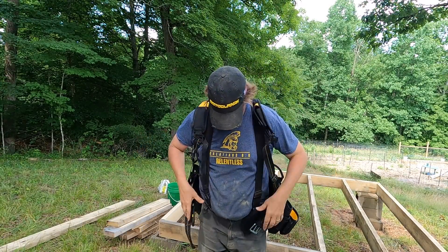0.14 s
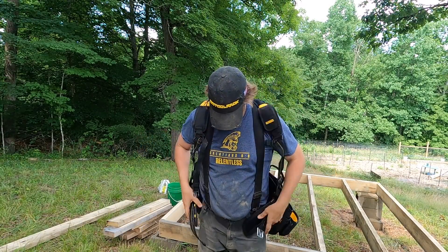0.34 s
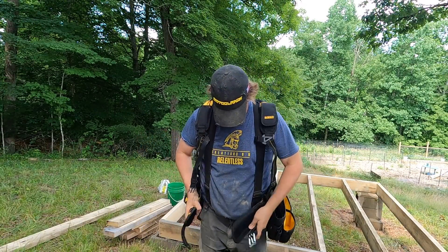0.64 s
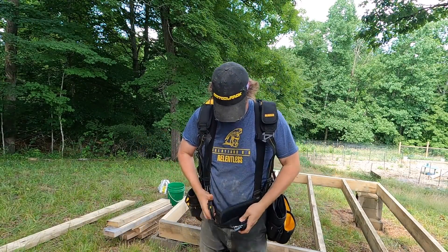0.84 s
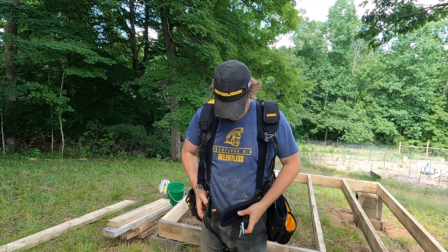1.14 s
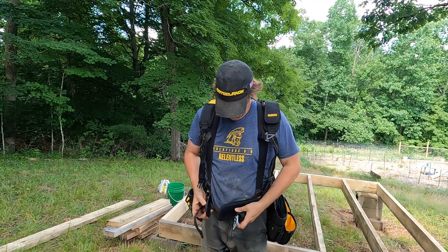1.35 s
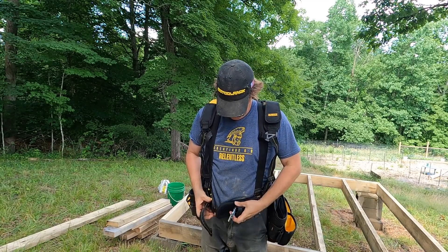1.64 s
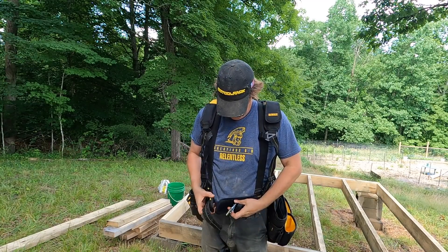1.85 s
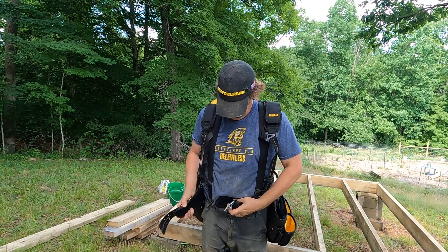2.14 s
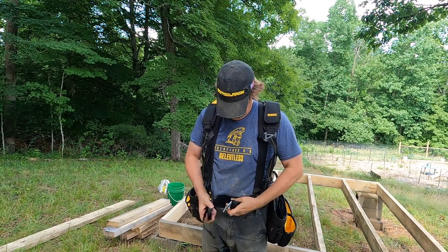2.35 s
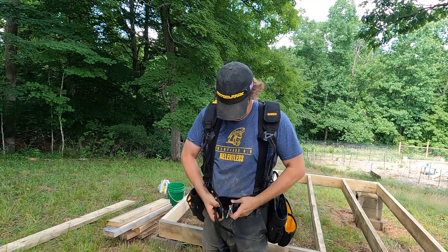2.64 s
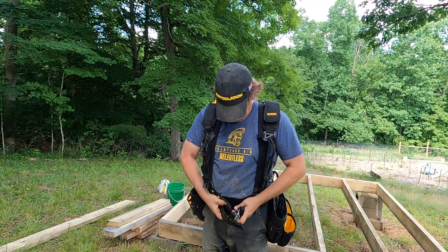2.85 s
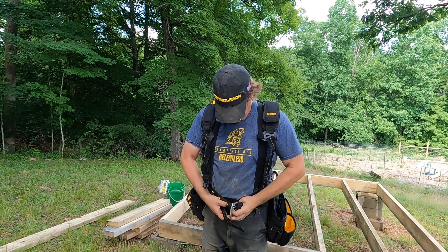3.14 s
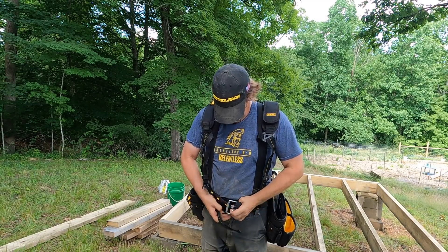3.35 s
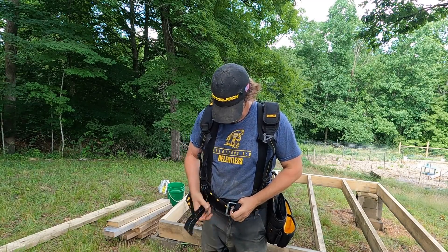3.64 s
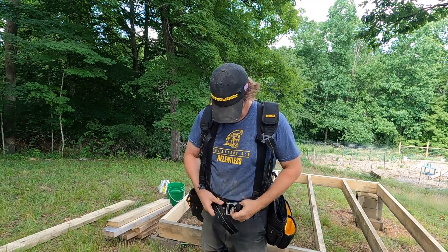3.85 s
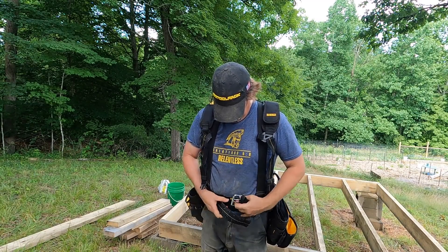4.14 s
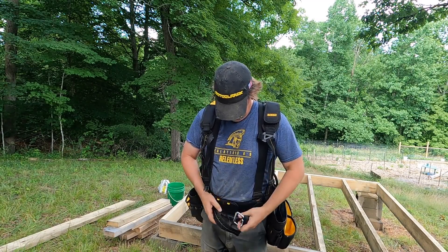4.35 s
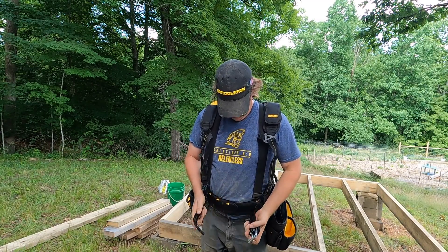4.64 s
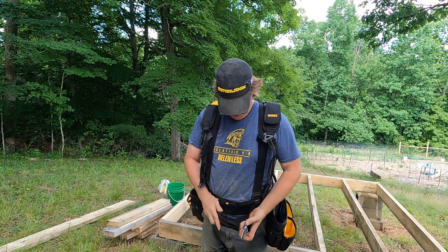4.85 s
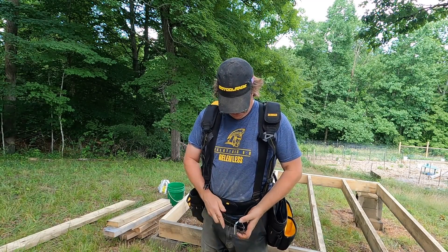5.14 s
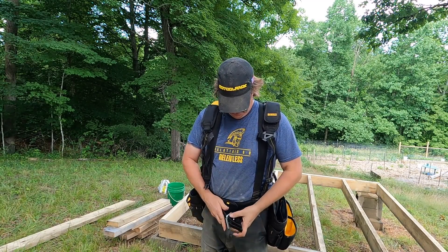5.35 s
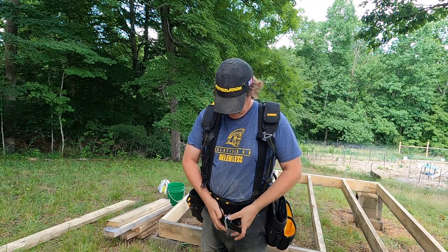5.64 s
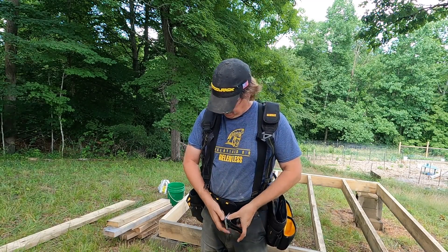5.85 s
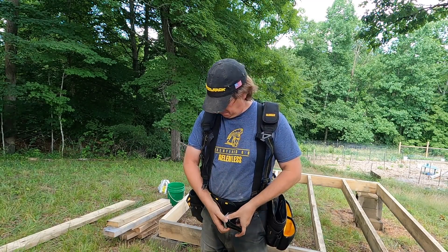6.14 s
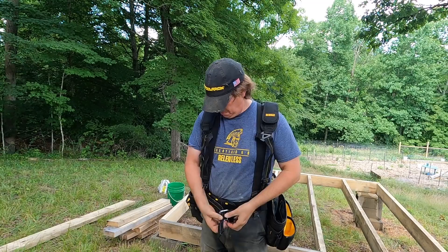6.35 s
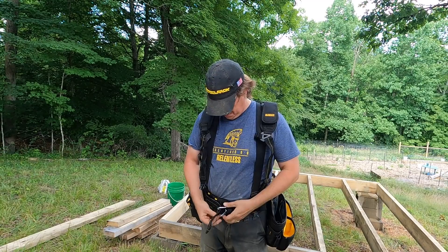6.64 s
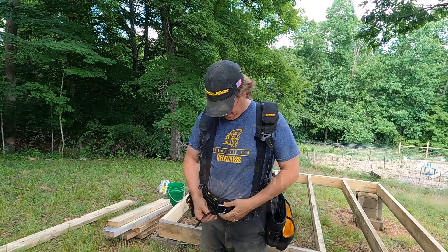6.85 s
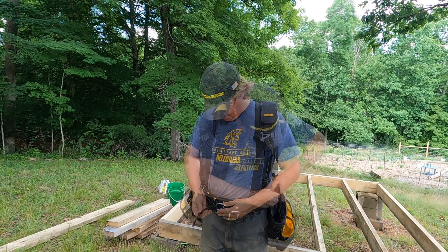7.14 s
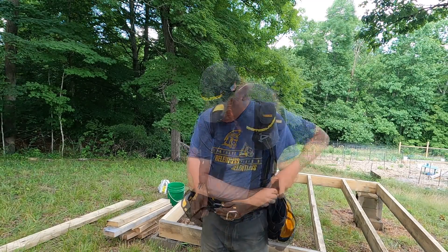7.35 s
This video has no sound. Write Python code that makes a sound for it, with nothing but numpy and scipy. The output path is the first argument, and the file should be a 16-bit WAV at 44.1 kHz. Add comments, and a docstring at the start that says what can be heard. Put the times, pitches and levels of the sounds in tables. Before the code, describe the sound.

Close, bright buckle jangles and dry clicks of tools as a strap is tightened in a quiet yard, with soft hum, leaf hiss and insects behind.

```python
"""A tool belt is pulled round the waist and fastened, outdoors, close in front of the microphone.
Its loose metal buckle jangles as ringing modes, and the halves scrape and snap together as short ones.
Tools tick and knock as struck, damped parts; the webbing rustles as stick-slip fibre noise.
Far off, a motor hums as three sines over the yard's soft noise, with faint insects and falling bird-like chirps.
The yard and insects dip by a few dB near the end and partly recover."""
import sys
import numpy as np
from scipy import signal
from scipy.fft import rfft, irfft, next_fast_len
from scipy.io import wavfile
from scipy.ndimage import uniform_filter1d, map_coordinates

SR = 44100
rng = np.random.default_rng(int(sys.argv[2]) if len(sys.argv) > 2 else 0)


def materialize(psi):
    """Save the field psi as 16-bit PCM at rate SR to the path in sys.argv[1].

    A 1-D psi becomes a single channel; in a 2-D psi each row is a channel.
    """
    bounded = np.clip(np.atleast_2d(psi).T, -1, 1)
    quanta = np.round(bounded * 32767).astype(np.int16)
    wavfile.write(sys.argv[1], SR, quanta)


N = 329868

# Distant yard and insects, relative level. Each row: time in seconds, level in dB.
YARD_LEVEL = [(6.8, 2.5), (7.15, -1), (7.48, 1)]
# The distant motor's steady tones. Each row: frequency in Hz, rms in dB before the yard level.
HUM = [(235.7, -52), (211.7, -65.5), (117.5, -71.5)]
# Spectrum of the motor's low rumble. Each row: frequency in Hz, density in dB per Hz.
YARD_LOW = [(15, -68), (25, -41.5), (130, -20), (156, -6.5), (204, -9), (259, -11.5), (366, -13),
            (445, -17.5), (565, -16.5), (900, -21), (1170, -66), (1980, -120)]
# Spectrum of the trees' hiss. Each row: frequency in Hz, density in dB per Hz.
YARD_HIGH = [(530, -46), (900, -37), (932, -11), (1020, 3), (1760, 2), (2200, 0), (3530, -3), (4510, -2.5),
             (5450, -7.5), (6580, -13), (9260, -35.5), (11400, -28), (15000, -56)]
# A thin band of distant insects. Each row: frequency in Hz, density in dB per Hz.
INSECTS = [(4800, -38), (5600, 18), (6400, -40)]
RUMBLE_SWELL_DB = .8  # depth of the rumble's slow swells

# Light, continual rubbing of the webbing. Each row: time in seconds, relative level in dB.
RUB = [(0, -47), (.42, -46.5), (.72, -41), (1.05, -45), (1.6, -50.5), (2.0, -52), (2.35, -44.5),
       (2.72, -50), (3.35, -43), (3.7, -51.5), (4.5, -46.5), (5.0, -53), (6.2, -57), (6.68, -45.5),
       (7.1, -54.5)]
# Firm strokes of strap, pouch and sleeve.
# Each row: middle in seconds, relative level in dB, half-length in seconds, centre in Hz.
STROKES = [(0.243, -41, 0.014, 2400), (0.543, -37.5, 0.056, 2200), (0.637, -41, 0.077, 1600),
           (1.01, -47.5, 0.044, 2100), (1.763, -39.5, 0.05, 550), (1.782, -41, 0.091, 2000),
           (2.106, -43.5, 0.042, 1990), (2.218, -37, 0.041, 2900), (2.518, -42.5, 0.046, 2800),
           (2.94, -43, 0.077, 1000), (3.411, -35, 0.03, 895), (3.939, -41.5, .03, 1900),
           (3.989, -42.5, 0.04, 1700), (4.426, -42.5, .07, 2200), (5.246, -46, 0.011, 1100),
           (5.412, -41, 0.02, 1100), (6.377, -45.5, 0.092, 2000), (6.957, -44, 0.018, 3000),
           (6.743, -48, 0.074, 2200)]
# Spectrum of the webbing. Each row: frequency in Hz, density in dB per Hz.
WEBBING = [(100, -26), (400, -4.5), (900, -7.5), (1600, -1.5), (2500, 1.5), (4000, -1.5), (6000, -11.5),
           (7300, -16), (8700, -32.5), (10800, -21.5), (12200, -35.5), (13500, -38), (15500, -51)]
FOLDS_DB = 2.8  # how far the colour drifts from fold to fold
CATCH_SPREAD_DB = 4  # unevenness of random impulses

# Blows on the loose buckle.
# Each row: start in seconds, relative ring level in dB, pitch in Hz, relative clash level in dB.
CLINKS = [(0.0091, -14.5, 4270, -37), (0.029, -19, 4250, -44), (0.1235, -24, 4200, -48),
          (0.1292, -16, 4140, -47), (0.139, -19.5, 4170, -55), (0.1825, -24.5, 4000, -33),
          (0.2115, -35, 4240, -50), (0.4366, -28.5, 4320, -43), (0.5632, -15.5, 4170, -33),
          (0.6225, -28, 4300, -34), (0.6265, -10, 4170, -25.5), (0.635, -20, 4140, -41),
          (0.6502, -26, 4000, -37), (0.6565, -24, 5000, -42), (0.6776, -17.5, 4200, -33),
          (0.683, -19, 4280, -35), (0.7071, -24, 4230, -40), (0.7255, -10.5, 4180, -18.5),
          (0.7352, -21, 4200, -28.5), (0.7694, -25, 4120, -42), (0.7964, -28, 4150, -46),
          (0.8035, -28, 3930, -32.5), (0.8809, -6.5, 4240, -39), (0.885, -10, 4170, -32),
          (0.889, -16, 4350, -35), (0.9012, -19.5, 4210, -31.5), (1.0598, -24.5, 4180, -34),
          (1.094, -29, 4120, -26), (1.2875, -17, 4175, -39.5), (1.503, -30.5, 4170, -63),
          (1.8234, -36, 4100, -38), (2.157, -32, 4190, -46), (2.9802, -15.5, 4040, -25.5),
          (3.0455, -15, 4100, -26.5), (3.0524, -13.5, 4030, -27), (3.0771, -19.5, 4020, -29.5),
          (3.082, -21, 4220, -36), (3.1188, -30, 4170, -45), (3.1387, -27, 4150, -35),
          (3.1577, -29, 4170, -36.5), (3.171, -33, 4140, -35), (3.2065, -35, 4950, -34),
          (3.225, -27, 4180, -31), (3.2315, -23, 4180, -37), (3.254, -36, 4220, -56),
          (3.2839, -18, 4200, -40), (3.2945, -21, 4160, -44), (3.3115, -30, 4070, -53),
          (3.3278, -22, 4250, -31), (3.34, -40, 4130, -37), (3.3995, -33, 4030, -26),
          (3.4057, -23, 4140, -44), (3.413, -33, 3860, -45), (3.4949, -29.5, 4150, -43),
          (4.0611, -14.5, 4140, -28), (4.0753, -19.5, 4200, -31), (4.1166, -28, 4120, -33.5),
          (4.4373, -21, 4160, -29), (4.4587, -17, 4070, -39), (4.469, -2.5, 4144, -34.5),
          (4.4756, -6.5, 4140, -28), (4.4855, -19, 4070, -26), (4.4882, -18, 4080, -30),
          (4.496, -13.5, 4130, -30), (4.5025, -21, 4190, -31), (4.586, -26, 4170, -39.5),
          (4.6005, -29, 3960, -36.5), (4.6157, -30, 4140, -30.5), (5.3374, -28, 4240, -40),
          (5.3868, -25, 4100, -36.5), (5.395, -23, 4140, -42), (6.685, -28, 4160, -51),
          (6.6961, -21, 4120, -39), (6.712, -29, 4130, -44), (6.722, -29, 4050, -29.5),
          (6.731, -20, 4120, -34), (6.7495, -27, 4220, -36), (6.7968, -36, 4200, -44)]
# The loose buckle shakes and chatters.
# Each row: start in seconds, length in seconds, relative ring level in dB, relative clash level in dB.
JANGLES = [(0.002, 0.028, -25.5, -44), (0.104, 0.044, -25.5, -39.5), (0.612, 0.064, -30, -39),
           (0.686, .06, -34, -37), (0.755, .065, -35, -43), (1.099, 0.025, -27.5, -36),
           (2.198, 0.025, -35, -44), (3.286, 0.027, -48, -67), (4.574, 0.032, -36, -52),
           (5.342, 0.062, -34, -49), (6.7, 0.057, -34, -46)]
# Further modes of the loose buckle.
# Each row: nominal frequency in Hz, relative level in dB, t60 in seconds when wholly free.
LOOSE_MODES = [(2900, -18, .05), (3855, -12, .045), (4148, -14, .16), (4300, -14, .05), (4515, -16, .08),
               (4973, -8, .1), (5990, -26, .06), (7615, -30, .09), (8892, -39, .24), (9590, -36, .13),
               (11003, -31, .07), (11395, -34, .16), (12600, -44, .15), (14110, -50, .12)]
# How freely the loose buckle rings as the grip changes. Each row: time in seconds, share of its free t60.
FREEDOM = [(0, 0.45), (1.3, 0.66), (3.05, 0.33), (3.33, 0.87), (4.07, 0.5), (4.5, 0.72), (5.4, 0.38)]
# Relative level of the buckle's treble modes. Each row: time in seconds, level in dB.
SPARKLE = [(0, -11), (.7, 0), (1.1, -3), (1.3, 6), (3.05, -9), (3.33, 9), (4.07, 5), (4.5, 7), (5.4, 1),
           (5.49, -8), (6.41, 2.5), (6.46, 11), (6.57, -3)]
# Spectrum of clashing metal. Each row: frequency in Hz, density in dB per Hz.
CLASH = [(300, -22), (1000, -11.5), (1800, 0.5), (3000, -1), (4200, -1.5), (5500, -1.5), (7000, -3.5),
         (8400, -21), (10000, -9.5), (11400, -17), (12100, -28), (13500, -22), (15500, -54)]
SPARKLE_ABOVE_HZ = 8000
SCATTER_DB = 5  # spread of mode levels from contact to contact
# Chatter: main mode (Hz), its spread (Hz), spread of force (dB)
CHATTER_HZ, CHATTER_SPREAD_HZ, CHATTER_SPREAD_DB = 4167, 70, 0.5
PRESS_DETUNE = .045  # share by which a fully pressed buckle's modes shift from touch to touch
# Touching metal buzzes: phase swing when fully pressed (radians), random knots per second
BUZZ_RAD, BUZZ_RATE = .7, 700
# Rings, rivets and springs that each contact shakes: range (Hz), nominal level (dB), middle t60 (s)
FITTINGS_LOW_HZ, FITTINGS_HIGH_HZ = 2600, 14000
FITTINGS_DB, FITTINGS_T60 = -8, .035

# Dry clicks of clips and tools in the pouches.
# Each row: start in seconds, relative peak in dB, centre in Hz, t60 in seconds.
CLICKS = [(0.238, -33, 2620, 0.011), (0.27, -26, 3000, 0.0093), (0.327, -24, 2740, 0.02),
          (0.6435, -24, 2350, 0.0095), (0.7265, -19.5, 2810, 0.037), (0.862, -25, 3400, 0.0071),
          (2.181, -25, 3660, 0.0087), (2.2355, -23, 2330, 0.011), (2.2715, -22, 2650, 0.012),
          (2.354, -21.5, 1800, 0.012), (2.3728, -23.5, 1770, 0.013), (2.4556, -22.5, 2600, 0.0035),
          (2.484, -24.5, 1980, 0.0044), (2.5278, -24, 3130, 0.0044), (2.814, -26, 2800, 0.011),
          (2.833, -24.5, 2290, 0.018), (2.8863, -24, 2080, 0.013), (2.9222, -26, 2670, 0.014),
          (2.9943, -18, 2670, 0.0055), (3.0183, -24.5, 2700, 0.013), (3.054, -19, 3440, 0.028),
          (3.2068, -19, 2620, 0.035), (3.3285, -26.5, 2300, 0.033), (3.4, -23, 2670, 0.029),
          (3.423, -24, 2850, .014), (4.314, -30, 4460, .005), (5.0476, -26.5, 2540, 0.013),
          (5.906, -30.5, 3680, .01), (6.7225, -26.5, 2000, .01), (6.7387, -11, 3540, 0.01),
          (6.7795, -23, 3170, 0.0039), (6.9455, -28, 3370, 0.014), (6.9492, -21, 2680, 0.033),
          (7.389, -30, 1820, 0.02), (7.3973, -15, 3470, 0.0086)]
# Overall colour of the clicks. Each row: frequency in Hz, gain in dB.
CLICK_COLOUR = [(100, -16), (450, 3), (1300, 1), (3500, 0), (5000, 1), (7000, -8), (8600, -24),
                (10600, -16), (12200, -27), (13500, -27), (15500, -52)]
# Ringing modes of a click. Each row: multiple of the centre, relative level in dB.
CLICK_MODES = [(1.001, 7), (1.33, -3.5)]
CLICK_TONE, RINGING_T60 = .9, .04  # share of ringing in a free part, and the t60 (s) that counts as free
CLACK_OCTAVES = 1.6  # breadth of a click's hump
LOW_EDGE = .48  # small parts radiate little below this share of their centre frequency
TICK_HZ, TICK_T60 = 2700, 0.003  # small ticks: middle of their centres, decay (s)
TICK_OVER_RUB_DB, TICK_SPREAD_DB, TICK_SPREAD_OCTAVES = 11, 3.5, .35

# Faint falling chirps, probably a bird in the trees.
# Each row: start in seconds, level in dB, nominal start frequency in Hz.
CHIRPS = [(2.63, -48, 4600), (2.772, -51, 4850), (3.335, -40, 4950), (3.462, -41, 4850), (3.585, -45, 4550)]

# Dull knocks of latch and pouch, one short push each.
# Each row: start in seconds, peak in dB before scatter, centre in Hz.
KNOCKS = [(3.5576, -21, 1700), (3.5666, -14, 1560), (3.5692, -10.5, 1470), (4.5592, -18.5, 2150),
          (5.0433, -16.5, 1200), (5.2423, -26, 1000), (6.7387, -13.5, 1990), (7.056, -25, 1900),
          (7.3979, -20, 2100)]
# Overall colour of the knocks. Each row: frequency in Hz, gain in dB.
KNOCK_COLOUR = [(150, -19), (500, 3), (3500, -3.5), (7000, -4), (9000, -18), (15000, -38)]

# The buckle halves snap together, held in the fingers.
# Each row: start in seconds, relative ring level in dB, pitch in Hz, relative clash level in dB.
SNAPS = [(4.7335, -28, 4060, -28), (4.7362, -19.5, 4170, -22), (4.815, -39, 4230, -37),
         (5.0502, -42, 5400, -34), (5.259, -39, 4100, -39), (5.4805, -16, 4240, -29),
         (5.4865, -4, 4270, -26.5), (5.4895, -17, 4180, -20), (6.4055, -1.5, 4250, -30),
         (6.4114, -9, 4300, -34), (6.414, -8, 4340, -29), (6.4172, -10, 4260, -38), (6.4218, -4, 4200, -29),
         (6.4263, -3.5, 4330, -23), (6.448, -17, 4200, -31.5), (6.4668, -19, 4400, -41),
         (6.4715, -16.5, 4240, -43), (6.505, -36, 4200, -56), (6.5684, -9, 4970, -28),
         (6.5703, -11.5, 5100, -30), (6.5718, -16.5, 3950, -43), (6.5922, -26, 3750, -40),
         (6.599, -30, 3950, -38), (6.6035, -29, 3850, -33)]
# The held halves skid over each other.
# Each row: start in seconds, length in seconds, relative ring level in dB, relative clash level in dB.
SCRAPES = [(4.739, 0.017, -22, -32), (6.432, 0.023, -28, -41)]
# Further modes of the held buckle. Each row: nominal frequency in Hz, relative level in dB, t60 in seconds.
HELD_MODES = [(2930, -19, .03), (3870, -11, .04), (4510, -12, .04), (4990, -12, .035), (6000, -20, .035),
              (6400, -19, .035), (6980, -19, .03), (7600, -23, .02), (9820, -24, .035), (10450, -27, .02),
              (11350, -31, .02)]

# Spread to the sides. Each row: frequency in Hz, side level against the middle in dB.
SIDE_LEVEL = [(200, -51), (2500, -52.5), (7000, -34.5), (10000, -30), (12000, -5)]
TOP_HZ = 15500  # upper band limit of the microphone channel


def amp(db):
    """Amplitude factor of a level in dB."""
    return 10 ** (np.asarray(db) / 20)


def unit(x):
    """x scaled to rms 1."""
    return x / np.sqrt(np.mean(x ** 2) + 1e-20)


def along(points, hz):
    """Values of (Hz, value) points, read on a log frequency axis."""
    f, v = np.transpose(points)
    return np.interp(np.log(hz + 1), np.log(f + 1), v)


def curve(rows):
    """(s, value) rows as one value per sample."""
    return np.interp(np.arange(N) / SR, *np.transpose(rows))


def wobble(rate):
    """A smooth random curve, rate knots a second."""
    knots = rng.standard_normal(int(N * rate / SR) + 4)
    return map_coordinates(knots, [np.arange(N) * rate / SR])


def filtered(x, response):
    """x times a response of frequency."""
    m = next_fast_len(N + SR // 2)
    return irfft(rfft(x, m) * response(np.fft.rfftfreq(m, 1 / SR)), m)[..., :N]


def coloured(x, spectrum):
    """x with the given spectrum, at rms 1."""
    return unit(filtered(x, lambda hz: amp(along(spectrum, hz))))


def impulse(gain, size=512):
    """Causal response of energy 1 with the given gain over frequency, by folding its cepstrum."""
    cep = irfft(np.log(gain(np.fft.rfftfreq(size, 1 / SR)) + 1e-6))
    cep[1:size // 2] *= 2
    cep[size // 2 + 1:] = 0
    h = irfft(np.exp(rfft(cep)))
    return h / np.linalg.norm(h)


def body(spectrum, centre, octaves):
    """Response of a small part: a broad hump with a steep low edge."""
    hump = lambda hz: np.hypot(1, 2 * np.log2((hz + 1) / centre) / octaves)
    edge = lambda hz: np.hypot(1, (LOW_EDGE * centre / (hz + 1)) ** 3)
    return impulse(lambda hz: amp(along(spectrum, hz)) / hump(hz) / edge(hz))


def decay(t, t60):
    """Amplitude that falls 60 dB in t60."""
    return np.exp(-np.log(1000) * t / max(t60, 1e-3))


def add(track, s, sound):
    """Mix a sound into the track at time s."""
    i = max(round(s * SR), 0)
    track[i:i + len(sound)] += sound[:max(N - i, 0)]


def grains(rate, size):
    """Sparse random impulses of uneven size, rate a second, rms about 1."""
    spread = np.minimum(rng.exponential(size=size), 2) - 1
    sizes = rng.standard_normal(size) * amp(CATCH_SPREAD_DB * spread)
    return (rng.random(size) < rate / SR) * sizes * np.sqrt(SR / rate)


def yard(low_db=-53.5, high_db=-54.5):
    """Far off: a steady motor hum, its low rumble and the hiss of the trees."""
    t = np.arange(N) / SR
    drift = 0.0001 * wobble(1.8)  # the shaft speed wanders slightly
    hum = sum(amp(db) * np.sqrt(2) * np.sin(2 * np.pi * hz * (t + drift)) for hz, db in HUM)
    hum = hum * amp(0.1 * wobble(2.05))
    rumble_level = amp(low_db + RUMBLE_SWELL_DB * wobble(2.81))
    rumble = rumble_level * coloured(rng.standard_normal(N), YARD_LOW)
    tree_level = amp(high_db + 0.13 * wobble(2.5))
    trees = tree_level * coloured(rng.standard_normal(N), YARD_HIGH)
    return (hum + rumble + trees) * amp(curve(YARD_LEVEL))


def insects(level_db=-63.5):
    """Far insects sing together as one narrow hiss that follows the yard level."""
    return amp(level_db + curve(YARD_LEVEL)) * coloured(rng.standard_normal(N), INSECTS)


def fibres(catches, catch_share, flutter_db=3.2, slips=130):
    """Friction force: a hiss of fibres that sticks and slips, with small catches."""
    hiss = rng.standard_normal(N) + catch_share * grains(catches, size=N)
    return hiss * unit(amp(flutter_db * wobble(slips)))


def patchy(x, depth_db, width_hz=600, length_s=.04):
    """The colour drifts as different folds touch: smooth random patches of gain."""
    z = signal.stft(x, nperseg=256)[2]
    field = rng.standard_normal(z.shape)
    for _ in range(2):
        field = uniform_filter1d(field, round(width_hz * 256 / SR), axis=0)
        field = uniform_filter1d(field, round(length_s * SR / 128), axis=1)
    gain = unit(amp(depth_db * unit(field)))
    return signal.istft(z * gain, nperseg=256)[1][:N]


def webbing(rub_db=-1, stroke_db=-1, octaves=2.1):
    """Nylon slides over cloth all the time; each firm stroke swells and has its own colour."""
    out = amp(rub_db + curve(RUB)) * coloured(fibres(catches=320, catch_share=0.61), WEBBING)
    force = fibres(catches=640, catch_share=1.04)
    for s, db, half_length, centre in STROKES:
        swell = np.hanning(round(2 * half_length * SR))
        cloth = body(WEBBING, centre, octaves)
        push = force[round(s * SR):][:len(swell)]
        stroke = unit(signal.fftconvolve(push, cloth)[:len(swell)])
        add(out, s - half_length, amp(db + stroke_db) * swell * stroke)
    return patchy(out, FOLDS_DB)


def fittings(t, count=14):
    """Every contact shakes a different handful of small metal parts, each with its own brief ring."""
    place, force, life, phase = rng.random((4, count, 1))
    hz = FITTINGS_LOW_HZ * (FITTINGS_HIGH_HZ / FITTINGS_LOW_HZ) ** place
    size = amp(FITTINGS_DB + along(CLASH, hz)) * 2 * force ** 2
    rings = np.sin(2 * np.pi * (hz * t + phase)) * decay(t / (.5 + life), FITTINGS_T60)
    return np.sum(size * rings, axis=0)


def buckle(contacts, modes, freedom, sparkle_db, ring_db, ring_t60, halving_db, modes_db,
           clash_db, clash_t60, attack, rattle_db, rattle_t60):
    """Each contact restarts the main bending mode, rings the others, clashes and sets off a fine rattle."""
    metal, clashes, rattles = np.zeros((3, N))
    t = np.arange(SR // 4) / SR
    short = SR // 20
    gaps = np.diff([row[0] for row in contacts], append=N / SR)
    onset = 1 - np.exp(-t / attack)
    for (s, db, pitch, hard_db), gap in zip(contacts, gaps):
        now = max(round(s * SR), 0)
        free = max(freedom[now], .1)
        # a harder blow presses the parts together and rings shorter
        t60 = ring_t60 * free * 2 ** (-db / halving_db)
        choke = decay(np.maximum(t - gap, 0), 0.0049)  # the next contact stops the old swing
        buzz = BUZZ_RAD * (1 - free) * map_coordinates(rng.standard_normal(BUZZ_RATE), [t * BUZZ_RATE])
        ring = amp(db + ring_db) * np.sin(2 * np.pi * pitch * t + buzz) * decay(t, t60) * choke
        strength_db = (db + hard_db) / 2  # hard contacts feed the other modes more
        for hz, level, free_t60 in modes:
            life = free_t60 * free
            treble_db = sparkle_db[now] * (hz > SPARKLE_ABOVE_HZ)
            size = free * amp(strength_db + modes_db + level + treble_db + SCATTER_DB * rng.normal())
            # touch shifts the damped modes most
            detune_hz = 1.3 / life + PRESS_DETUNE * hz * (1 - free) ** 2
            detuned = hz + detune_hz * rng.normal()
            phase = rng.uniform(0, 2 * np.pi)
            ring += size * np.sin(2 * np.pi * detuned * t + phase) * decay(t, life)
        add(metal, s, ring * onset)
        add(metal, s, amp(hard_db) * fittings(t[:short]) * onset[:short])
        clash = grains(6000, size=len(t)) * decay(t, clash_t60) * onset ** 2
        add(clashes, s, amp(hard_db + clash_db) * clash)
        rattle = grains(500, size=len(t)) * decay(t, rattle_t60)
        add(rattles, s, amp(strength_db + rattle_db) * rattle)
    splash = lambda hz: amp(along(CLASH, hz))
    # tiny bounces favour the main mode
    tinkle = lambda hz: splash(hz) * (1 + 5.0 / np.hypot(1, (hz - 4250) / 220))
    clash_sound = signal.fftconvolve(clashes, impulse(splash))[:N]
    rattle_sound = signal.fftconvolve(rattles, impulse(tinkle))[:N]
    return metal + clash_sound + rattle_sound


def chatter(bursts, count=10):
    """Each burst is a handful of unevenly spaced contacts: rows (s, ring dB, pitch Hz, clash dB)."""
    contacts = []
    for start, length, ring_db, clash_db in bursts:
        times = start + length * (np.arange(count) + rng.random(count)) / count
        force, shift, edge = rng.standard_normal((3, count))
        rings_db = ring_db + CHATTER_SPREAD_DB * force
        pitches = CHATTER_HZ + CHATTER_SPREAD_HZ * shift
        clashes_db = clash_db + CHATTER_SPREAD_DB * edge
        contacts += zip(times, rings_db, pitches, clashes_db)
    return contacts


def loose_buckle(contacts):
    """The dangling half rings as long as the grip lets it."""
    return buckle(contacts, LOOSE_MODES, curve(FREEDOM), curve(SPARKLE), ring_db=3.5, ring_t60=0.035,
                  halving_db=46.0, modes_db=4.0, clash_db=-1.5, clash_t60=0.02, attack=0.00048,
                  rattle_db=-29.0, rattle_t60=0.1)


def ticks(count=36):
    """Small parts tick at random, more often and louder as the belt moves: rows as in CLICKS."""
    travel = np.cumsum(amp(curve(RUB)) ** 2)
    marks = travel[-1] * (np.arange(count) + rng.random(count)) / count
    times = np.searchsorted(travel, marks) / SR
    rows = []
    for s, (force, shift) in zip(times, rng.standard_normal((count, 2))):
        rub_db = np.interp(s, *np.transpose(RUB))
        peak_db = rub_db + TICK_OVER_RUB_DB + TICK_SPREAD_DB * force
        rows.append((s, peak_db, TICK_HZ * 2 ** (TICK_SPREAD_OCTAVES * shift), TICK_T60))
    return rows


def clicks(rows, level_db=-1, tail_db=-23, tail_t60=0.038):
    """Damped parts knock: a broad clack and a faint rattle; the freer the part, the more it rings."""
    out, t = np.zeros(N), np.arange(SR // 10) / SR
    for s, db, centre, t60 in rows:
        modes = sum(amp(level) * np.sin(2 * np.pi * ratio * centre * t) for ratio, level in CLICK_MODES)
        ring = CLICK_TONE * min(t60 / RINGING_T60, 1) * modes
        blow = (rng.standard_normal(len(t)) + ring) * decay(t, t60)
        rattle = amp(tail_db) * rng.standard_normal(len(t)) * decay(t, tail_t60)
        click = signal.fftconvolve(blow + rattle, body(CLICK_COLOUR, centre, CLACK_OCTAVES))
        add(out, s, amp(db + level_db) * click / np.abs(click).max())
    return out


def chirps(length=.05, fall=.22, waver=.033):
    """Thin, unsteady whistles that bend downwards."""
    out, u = np.zeros(N), np.linspace(0, 1, round(length * SR))
    for s, db, hz in CHIRPS:
        pitch = hz * (1 - fall * u * np.sqrt(u) + waver * wobble(980)[:len(u)])
        phase = 2 * np.pi * np.cumsum(pitch) / SR
        add(out, s, amp(db) * np.sin(np.pi * u) * np.sin(phase))
    return out


def knocks(level_db=0, sharpness=0.82, tail_db=-27, tail_t60=0.026):
    """A damped part is pushed once: a single swing, then a faint shiver."""
    out, t = np.zeros(N), np.arange(SR // 20) / SR
    for s, db, centre in KNOCKS:
        damping = lambda hz: np.hypot(1, sharpness * ((hz + 1) / centre - centre / (hz + 1)))
        swing = lambda hz: amp(along(KNOCK_COLOUR, hz)) / damping(hz)
        shiver = amp(tail_db) * rng.standard_normal(len(t)) * decay(t, tail_t60)
        force = (t == 0) + shiver
        knock = signal.fftconvolve(force, impulse(swing))
        add(out, s, amp(db + level_db) * knock / np.abs(knock).max())
    return out


def held_buckle(contacts):
    """Pinched in the fingers, the halves clack and die quickly."""
    return buckle(contacts, HELD_MODES, np.ones(N), curve(SPARKLE), ring_db=-1.0, ring_t60=0.012,
                  halving_db=24.0, modes_db=1.0, clash_db=-1.5, clash_t60=0.016, attack=0.0002,
                  rattle_db=-23.0, rattle_t60=0.19)


def surroundings(x, near_db=-18, near_t60=0.095, far_db=-31, far_t60=1.0):
    """Weak scatter from the ground and lumber, and a fainter answer from the trees."""
    t = np.arange(SR) / SR
    out = x.copy()
    for db, t60 in ((near_db, near_t60), (far_db, far_t60)):
        tail = rng.standard_normal(len(t)) * decay(t, t60) * (t > .004)
        out += amp(db) * signal.fftconvolve(x, tail / np.linalg.norm(tail))[:N]
    return out


def scene():
    """The belt is straight ahead of the microphone; chiefly the highest treble spreads to the sides."""
    loose = loose_buckle(CLINKS) + loose_buckle(chatter(JANGLES))
    held = held_buckle(SNAPS) + held_buckle(chatter(SCRAPES))
    hard_parts = loose + held + clicks(CLICKS + ticks()) + knocks()
    mid = surroundings(hard_parts) + webbing() + chirps() + insects() + yard()
    side = filtered(mid, lambda hz: 1j * amp(along(SIDE_LEVEL, hz)))  # a quarter turn out of phase
    return np.array([mid + side, mid - side])


def record(dry):
    """The microphone channel keeps nothing above its band limit."""
    return filtered(dry, lambda hz: hz < TOP_HZ)


dry = scene()
out = record(dry)
materialize(out)
```